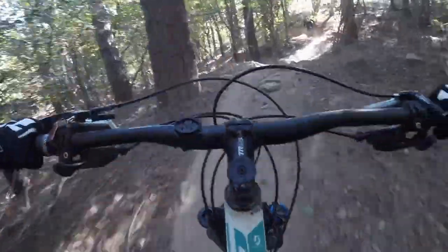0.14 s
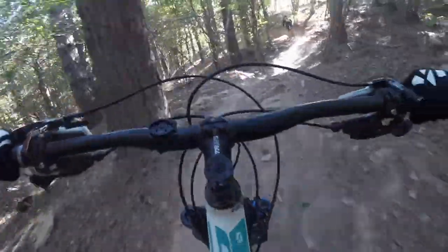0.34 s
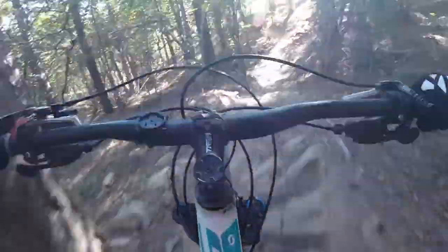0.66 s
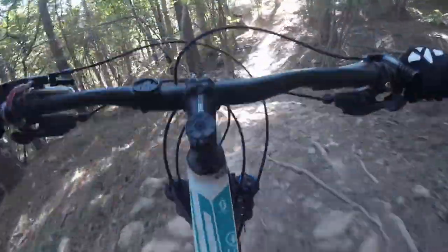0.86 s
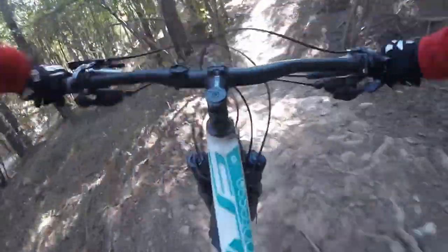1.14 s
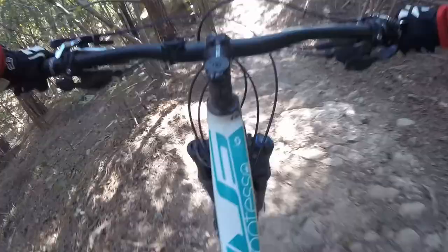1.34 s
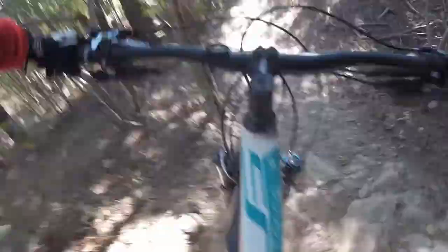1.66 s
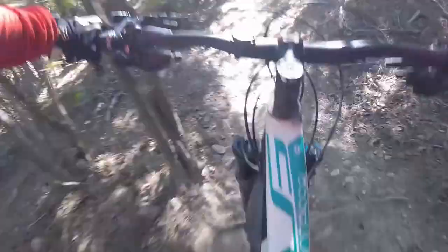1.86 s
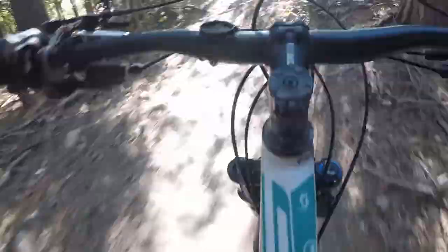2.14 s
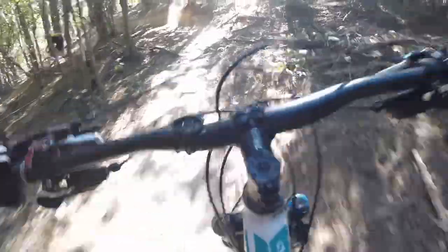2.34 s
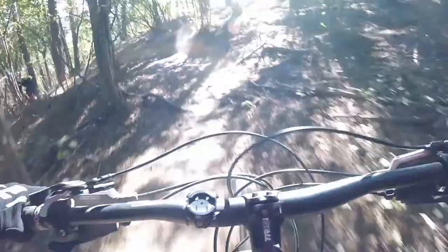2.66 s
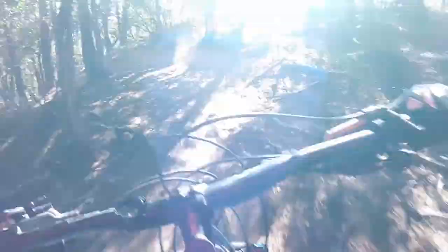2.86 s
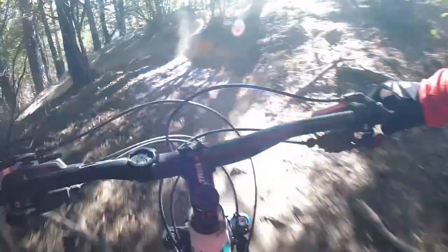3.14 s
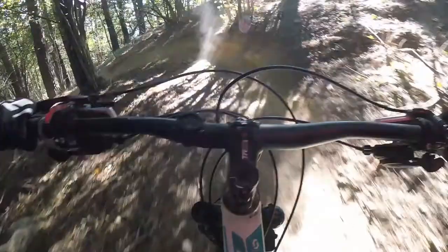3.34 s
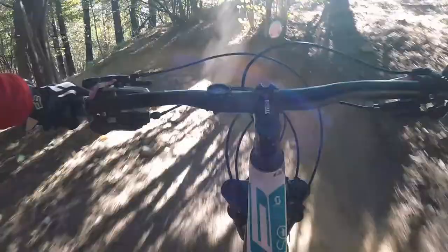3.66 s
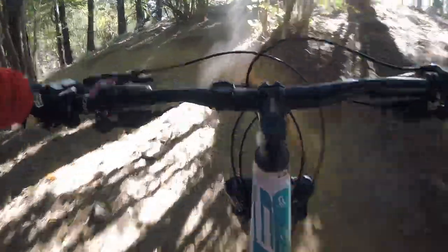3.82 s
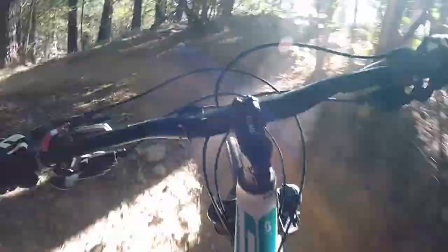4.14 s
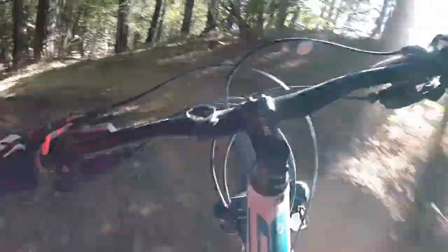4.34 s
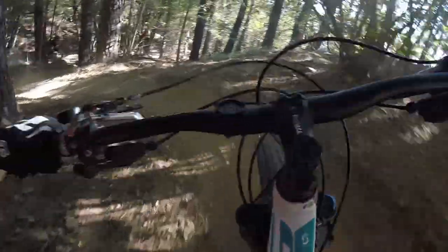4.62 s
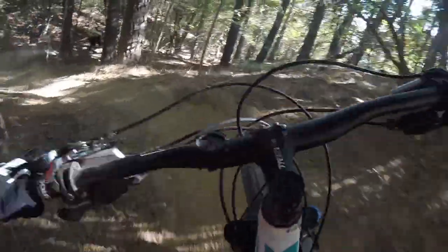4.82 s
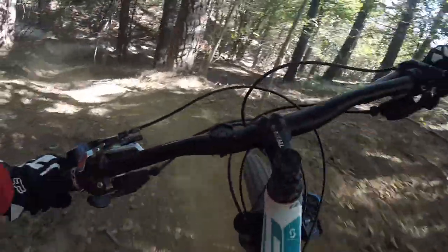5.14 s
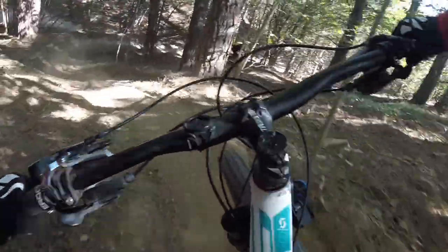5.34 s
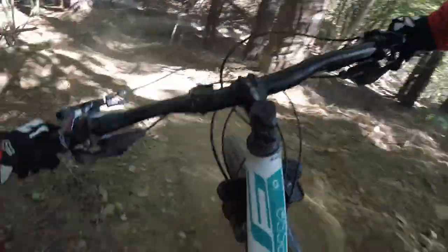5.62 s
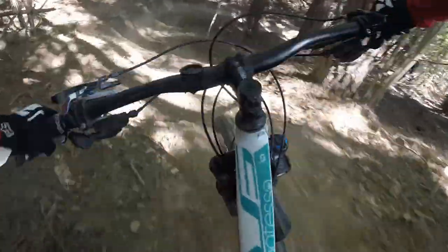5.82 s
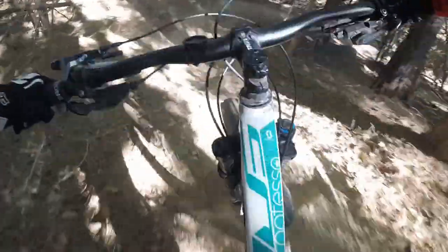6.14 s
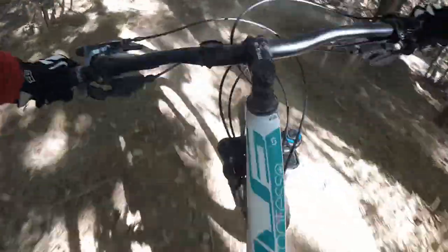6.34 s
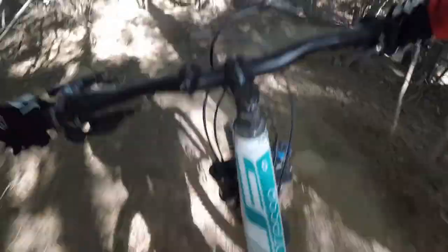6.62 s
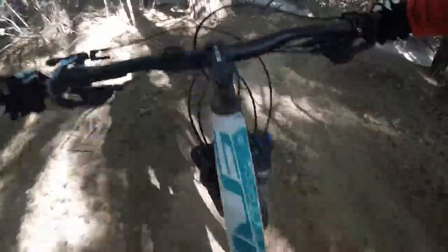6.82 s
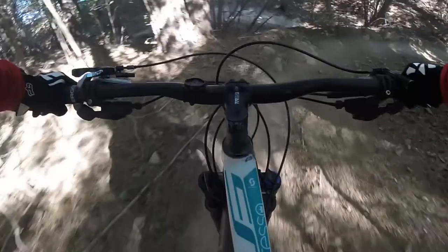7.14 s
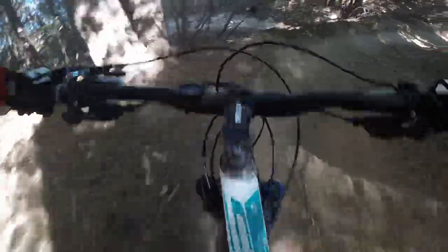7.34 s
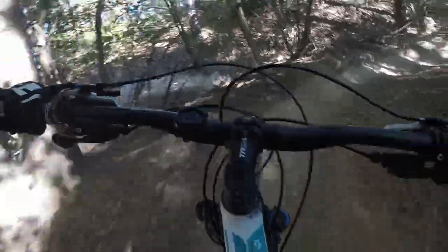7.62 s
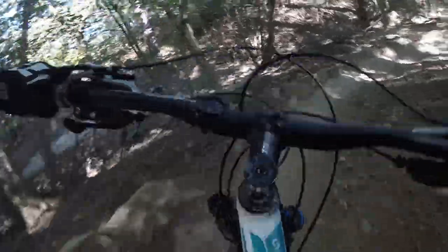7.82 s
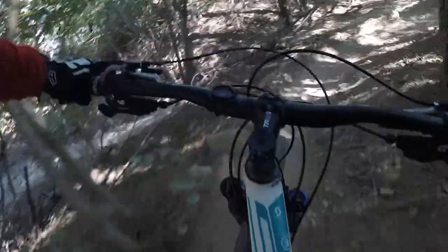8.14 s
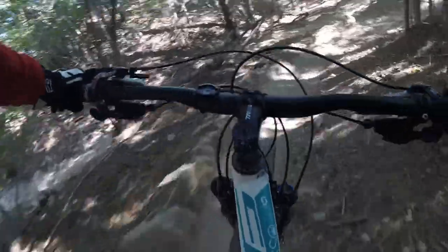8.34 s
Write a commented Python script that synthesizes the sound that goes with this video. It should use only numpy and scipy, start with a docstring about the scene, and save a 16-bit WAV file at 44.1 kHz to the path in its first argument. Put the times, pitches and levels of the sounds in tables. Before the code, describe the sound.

Rough mid-pitched brake howling comes and goes as a bike bounces down a dry rocky trail, tyres rumbling, stones knocking the frame.

```python
"""A disc brake howls in stretches as a mountain bike descends a dry rocky trail, heard at the rider's chest.
The howl is one rotor tone with its harmonics, beside short rising chirps, all made from sine waves.
Wind, tyre rumble, tread hum and the hiss of grit and pads are noise, each with its own spectrum.
Chain and cables rattle in short noise bursts; rocks strike in sharp pushes that ring the frame."""
import sys
import numpy as np
from scipy import signal
from scipy.fft import rfft, irfft, next_fast_len
from scipy.io import wavfile
from scipy.ndimage import uniform_filter1d

SR = 44100
rng = np.random.default_rng(int(sys.argv[2]) if len(sys.argv) > 2 else 0)


def master(y):
    """Save y as 16-bit WAV."""
    cut = np.clip(np.atleast_2d(y).T, -1, 1)
    pcm = np.round(cut * 32767)  # scale
    wavfile.write(sys.argv[1], SR, pcm.astype(np.int16))


N = 373968  # length in samples


def amp(db):
    """Turn decibels into a plain factor."""
    return 10 ** (np.asarray(db) / 20)


def unit(x):
    """Scale x to an RMS level of 1."""
    return x / np.sqrt(np.mean(x ** 2) + 1e-20)


def curves(rows):
    """One value per sample for each column after the time, joined by straight lines."""
    times, *columns = np.transpose(rows)
    return [np.interp(np.arange(N) / SR, times, column) for column in columns]


def wobble(count):
    """A random curve with count knots a second, joined by straight lines."""
    knots = rng.standard_normal(int(N * count / SR) + 2)
    return np.interp(np.arange(N) * count / SR, np.arange(len(knots)), knots)


def filtered(x, response):
    """Multiply the spectrum of x by a response that depends on frequency."""
    size = next_fast_len(N + SR // 2)
    spectrum = rfft(x, size) * response(np.fft.rfftfreq(size, 1 / SR))
    return irfft(spectrum, size)[..., :N]


def coloured(x, points):
    """Shape x by a curve of (frequency [Hz], gain [dB]) points on a log frequency axis."""
    f, db = np.transpose(points)
    return filtered(x, lambda hz: amp(np.interp(np.log(hz + 1), np.log(f + 1), db)))


def ringing(x, modes):
    """Let x ring resonances of (frequency [Hz], width [Hz], gain [dB]); wider ones die away faster."""
    def response(f):
        total = 0
        for k, (centre, width, db) in enumerate(modes):
            damping = 1j * f * width
            total = total + (-1) ** k * amp(db) * damping / (centre * centre - f * f + damping)
        return total

    return filtered(x, response)


def bursts(times, dbs, t60):
    """Noise bursts that start suddenly and fall by 60 dB in t60 seconds."""
    kicks = np.zeros(N)
    kicks[np.round(times * SR).astype(int)] = amp(dbs)
    t = np.arange(SR // 10) / SR
    return signal.fftconvolve(kicks, amp(-60 * t / t60))[:N] * rng.standard_normal(N)


# stretches of braking, each a list of (time [s], relative level of the rotor tone [dB])
HOWL = [
    [(0.0, -20), (0.1, -10.5), (0.338, -19.5), (0.53, -10.5), (0.91, -16.5), (0.93, -16), (1.214, -19),
     (1.398, -41), (1.5, -46)],
    [(3.05, -60), (3.136, -22), (3.24, -12), (3.408, -16.5), (3.596, -13), (3.63, -19.5), (3.68, -8.5),
     (3.892, -15.5), (4.3, -17.5)],
    [(4.3, -20.5), (4.378, -25), (4.552, -19), (4.582, -30), (4.636, -16.5), (5.14, -20), (5.182, -14),
     (5.436, -10.5), (5.6, -26)],
    [(5.6, -24), (5.636, -11), (5.664, -16), (5.728, -9.5), (5.864, -13.5), (5.988, -9), (6.21, -12.5),
     (6.304, -31), (6.33, -19)],
    [(6.33, -28), (6.448, -11), (6.656, -13), (6.69, -25.5), (6.836, -14.5), (7.218, -11), (7.312, -31.5),
     (7.778, -52), (7.8, -64)],
    [(8.2, -48), (8.3, -37), (8.36, -26.5), (8.412, -12.5), (8.47, -17)],
]


def howl_level():
    """Level curve of the rotor tone in dB; it drops to -90 between stretches that do not join."""
    rows = []
    for stretch in HOWL:
        if rows and stretch[0][0] - rows[-1][0] > .1:
            rows += [(rows[-1][0] + .05, -90), (stretch[0][0] - .02, -90)]
        rows += stretch
    return curves(rows)[0]


# the pads bite and the slips sharpen: (time [s], length [s],
# relative levels of 2nd harmonic [dB], brass [dB] and edge [dB])
BITES = [(0.21, 0.59, -37, -34.5, -46), (0.754, 0.094, -17.5, -24.5, -29),
         (0.847, 0.13, -20.5, -27.5, -35.5), (0.976, 0.044, -17, -23.5, -28),
         (3.177, 0.13, -38, -31.5, -44.5), (3.398, 0.26, -29, -29, -42), (3.667, 0.21, -32.5, -38, -51),
         (3.824, 0.2, -32, -25.5, -41), (4.034, 0.13, -27, -28.5, -45), (4.384, 0.16, -20.5, -30.5, -66),
         (4.607, 0.11, -27.5, -30.5, -38), (4.732, 0.13, -24, -65, -62), (4.88, 0.089, -29, -42, -63),
         (4.98, 0.199, -21, -32.5, -58), (5.04, 0.072, -30, -36, -36.5), (5.172, 0.2, -34, -36, -37.5),
         (5.482, 0.036, -26, -30.5, -40), (5.68, 0.22, -35, -30, -40), (5.867, 0.385, -29.5, -36, -42),
         (6.398, 0.274, -29, -32.5, -41), (6.672, 0.21, -35, -45, -54), (6.764, 0.2, -60, -31, -44.5),
         (6.933, 0.12, -16.5, -40, -35), (7.028, 0.21, -60, -36.5, -47), (7.237, 0.12, -41, -48, -56),
         (8.404, 0.09, -21.5, -27, -37)]
BITE_RISE_S, BITE_FALL_S = 0.019, 0.064


def bites():
    """Gains of the 2nd harmonic, brass and edge: each bite rises, holds and falls."""
    t = np.arange(N) / SR
    gains = np.zeros((3, N))
    for start, length, *dbs in BITES:
        rise = (t - start) / BITE_RISE_S + .5
        fall = (start + length - t) / BITE_FALL_S + .5
        shape = np.clip(np.minimum(rise, fall), 0, 1)
        gains = np.maximum(gains, amp(dbs)[:, None] * shape ** 2)
    return gains


# harmonics that grow as the slips sharpen: (multiple of the rotor tone, relative level [dB])
BRASS = [(3, 4), (4, -5), (5, -2.5), (6, -12), (7, -20.5), (8, -19.5)]
# the highest harmonics: (multiple of the rotor tone, relative level [dB])
EDGE = [(9, -3), (10, 1), (11, -6), (12, -11), (13, -20.5), (14, -16.5), (19, -22)]
ROTOR_HZ = 536
SOFT_SECOND_DB, SOFT_BRASS_DB = -15, -26.5  # harmonics between bites, relative to the rotor tone
FLUTTER, FLUTTER_LOW = 0.38, 0.11  # fast roughness of the upper harmonics, and of the lowest two
EDGE_GAPS = 1.5  # a larger value makes the highest harmonics drop out more


def howl():
    """Pads stick and slip at one rotor tone; each harmonic swells, and the upper ones drop out briefly."""
    first_db = howl_level()
    second, brass, edge = bites()
    second_db = 20 * np.log10(second + amp(first_db + SOFT_SECOND_DB))
    brass_db = 20 * np.log10(brass + amp(first_db + SOFT_BRASS_DB))
    edge_db = 20 * np.log10(edge + 1e-5)
    pitch = ROTOR_HZ + wobble(count=12) + 3 * wobble(count=90)
    phase = 2 * np.pi * np.cumsum(pitch) / SR
    grip = wobble(count=40)  # pad pressure varies round the rotor

    def partial(k, db, depth):
        rough = FLUTTER_LOW if k < 3 else FLUTTER
        hold = np.tanh(1.035 + depth * wobble(count=45))  # steady, with short gaps where it changes sign
        swell = amp(db + 3 * np.tanh(depth) * wobble(count=16))
        flicker = 1 + rough * wobble(count=200)
        wave = np.sin(k * phase + rough * wobble(count=110))
        return amp(3.5) * swell * hold * flicker * wave

    tone = partial(1, first_db + 0.29 * grip, 0.31)
    tone += partial(2, second_db + 0.98 * grip, 1.0)
    bite_db = 2.5 * grip
    tone += sum(partial(k, brass_db + db + bite_db, 1.2) for k, db in BRASS)
    tone += sum(partial(k, edge_db + db + bite_db, EDGE_GAPS) for k, db in EDGE)

    # a weaker slip wanders around a pitch just above the 2nd harmonic
    stray = 2 * phase + 2 * np.pi * np.cumsum(45 + 35 * wobble(count=22)) / SR
    stray_gain = amp(second_db - 11.5 + 4.7 * wobble(count=30))
    tone += stray_gain * np.sin(stray + 0.83 * wobble(count=150))

    scrub = unit(ringing(rng.standard_normal(N), [(503.8, 15.5, 20.5), (1043, 51, 3.6)]))
    scrub_gain = amp(0.18 * second_db - 28.5 + 2.2 * wobble(count=25)) * (first_db > -80)
    # grit under the slipping pads
    rasp = unit(ringing(rng.standard_normal(N), [(1540, 480, -11.5), (2620, 91, 6.5)]))
    rasp_gain = amp(0.42 * (brass_db + second_db) - 26.0 + 3.3 * grip)
    return tone + scrub_gain * scrub + rasp_gain * rasp


# strength of the wind: (time [s], level [dB])
WIND = [(0, -11), (.4, -17), (.55, -21), (.9, -18), (1.06, -30), (1.2, -12.5), (1.4, -17), (1.65, -10.5),
        (1.85, -13), (1.95, -6.5), (2.38, -22.5), (2.55, -17), (3.5, -21), (3.75, -12), (4.35, -21.5),
        (4.6, -14), (4.9, -22), (5.75, -16), (6.16, -25), (6.65, -14), (6.85, -19), (7.45, -14), (8.1, -21),
        (8.47, -24.5)]
# spectrum of the wind: (frequency [Hz], relative level [dB])
BUFFET = [(6, -20), (15, 10), (30, 6), (55, -4.5), (90, -41), (200, -51), (400, -120)]


def wind(gust):
    """Wind buffets the microphone: deep noise that swells with the gusts."""
    swell = amp(4.3 * gust + 0.72 * wobble(count=25))
    buffet = unit(swell * coloured(rng.standard_normal(N), BUFFET))
    return amp(curves(WIND)[0]) * buffet


# strength of the tyre rumble: (time [s], level [dB])
GROUND = [(0, -21.5), (.6, -32), (.84, -16.5), (1.18, -31.5), (1.46, -27), (1.52, -9.5), (1.63, -25),
          (1.75, -24), (1.82, -8.5), (1.87, -21.5), (2.08, -19), (2.35, -29), (2.46, -18.5), (2.9, -23.5),
          (3.5, -27.5), (3.8, -24.5), (4.2, -29.5), (5.3, -28.5), (5.46, -21.5), (5.85, -27), (6.16, -31.5),
          (6.32, -17.5), (6.45, -29.5), (6.8, -21), (7.3, -27), (7.45, -21.5), (7.7, -27.5), (8.47, -33.5)]
# spectrum of the tyre rumble: (frequency [Hz], relative level [dB])
RUMBLE = [(30, -31.5), (60, 11.5), (160, -2), (210, -6.5), (300, -15.5), (450, -15), (1500, -28.5),
          (4000, -70)]


def tyre_rumble(gust):
    """Tyres rumble in lumps: low noise with an uneven, limited swing in level."""
    lumps_db = 1.7 * gust + 3 * wobble(count=20) + 4.0 * wobble(count=60)
    lumps = amp(10.3 * np.tanh(lumps_db / 9))
    rumble = unit(lumps * coloured(rng.standard_normal(N), RUMBLE))
    return amp(curves(GROUND)[0]) * rumble


# strength of the hum of the tyre knobs: (time [s], level [dB])
TREAD = [(0, -36), (3.7, -34.5), (5.2, -51), (6.9, -41.5), (8.48, -35.5)]


def tread_hum():
    """Tyre knobs hum: noise narrowed by two resonances in a row."""
    hum = ringing(ringing(rng.standard_normal(N), [(240.0, 27, 0)]), [(250, 96, 0)])
    return amp(curves(TREAD)[0]) * unit(amp(5.9 * wobble(count=15)) * hum)


# strength of the grit hiss: (time [s], relative level [dB])
GRIT = [(0, -33), (1.1, -36.5), (1.55, -36), (2.1, -36.5), (2.35, -38.5), (2.9, -36), (3.9, -34.5),
        (5.5, -39), (7.4, -38.5), (8.47, -38)]
# spectrum of the hiss, also used for the rattle ticks: (frequency [Hz], relative level [dB])
HISS = [(410, 6), (700, -1), (990, 7.5), (1130, -1.5), (1610, 1.5), (2400, -1.5), (2770, -2.5), (4230, -9),
        (5260, -0.5), (8460, -13.5), (10400, -14), (12000, -32.5), (13400, -25.5), (15100, -49.5)]
PAD_HISS_DB = -6.5  # hiss of biting pads, relative to the brass


def hiss():
    """Grit and pads hiss: steady noise plus many tiny grains that die away quickly."""
    loose = np.clip(-howl_level() / 40, .4, 1)  # the tyres skip more when the brake is off
    rough = loose * (wobble(count=12) + wobble(count=45))
    hits = rng.random(N) < 160 / SR  # about 160 stones a second
    stones = hits * amp(9.5 * rng.exponential(size=N).clip(0, 2) + 5.0 * rough)
    grains = signal.fftconvolve(stones, amp(-60 * np.arange(600) / SR / .005))[:N]
    noise = (amp(1.6 * rough) + 0.37 * loose * grains) * rng.standard_normal(N)
    sound = unit(coloured(noise, HISS))
    sound += ringing(sound, [(1610, 17, 8.0), (2750, 16, -5)])  # the shaken rotor rings faintly
    pad_gain = amp(PAD_HISS_DB) * bites()[1]
    return np.hypot(amp(curves(GRIT)[0]), pad_gain) * sound


# main rattles: (time [s], relative level [dB], low part relative to it [dB])
RATTLES = [(0.185, -32.5, 1), (0.948, -25, 0.5), (1.1053, -26, -14), (1.13, -27.5, -4), (1.184, -25, -27),
           (1.246, -19, -22), (1.288, -30, -23), (1.355, -25, -22), (1.4701, -22.5, -6.5), (1.5268, -28, 7),
           (1.549, -21, -33), (1.58, -28, -8), (1.603, -25.5, -20), (1.63, -26.5, -2), (1.666, -28, -11),
           (1.7726, -26, -7), (1.783, -25, -12), (1.826, -26, -20), (1.905, -33, -6), (1.926, -23, -10),
           (1.945, -23, -11), (2.01, -22, -7), (2.0604, -24, -14), (2.163, -32.5, -3), (2.227, -32, -13),
           (2.378, -38, -2), (2.552, -31.5, -1), (2.702, -25, -10.5), (2.783, -24, -18),
           (2.797, -25.5, -25), (3.649, -20, -20), (4.263, -26, -12), (6.978, -22, -26), (7.358, -29, -2),
           (7.4005, -25.5, -9), (7.45, -27, -37), (7.803, -31.5, -25), (7.9, -25, -23.5),
           (8.037, -28.5, -16), (8.12, -30, -10.5), (8.1616, -26.5, -14)]
# resonances of the chain: (frequency [Hz], width [Hz], gain [dB])
CHAIN = [(1640, 110, 12.5), (2600, 450, 16.5), (3120, 790, -11.5)]
# resonances of a slap, also used by the rock knocks: (frequency [Hz], width [Hz], gain [dB])
SLAP = [(870, 1020, -3), (1330, 1040, -4)]
# treble loss of the low rattle parts: (frequency [Hz], gain [dB])
DULL = [(9500, 0), (12000, -12)]
LOOSE_PER_S = 60  # small chance rattles per second
LOOSE_DB = -16  # their base level, relative to the grit curve
BRAKED_DB = -9  # change in their level while the brake holds the bike taut


def rattles():
    """Chain and cables slap the frame in short ticks; small ones follow the grit and fade under braking."""
    s, db, low_db = np.transpose(RATTLES)
    when, size = rng.random((round(N / SR * LOOSE_PER_S), 2)).T
    when = when * (N - 1) / SR
    braking = howl_level() > -36
    grit_db = curves(GRIT)[0] + BRAKED_DB * braking
    loose_db = grit_db[np.round(when * SR).astype(int)] + LOOSE_DB + 12 * size

    low = bursts(s, db + low_db, 0.056) + bursts(when, loose_db, 0.048)
    ticks = bursts(s, db + 0.5, 0.03) + bursts(when, loose_db + 10, 0.0043)
    ticks = uniform_filter1d(ticks, size=2)
    chain = amp(-0.5) * ringing(low, CHAIN)
    slap = amp(-7) * ringing(bursts(when, loose_db, .03), SLAP)
    return amp(7.5) * coloured(ticks, HISS) + coloured(chain + slap, DULL)


# rock strikes: (time [s], relative level [dB], slap relative to it [dB], thump relative to it [dB])
KNOCKS = [(0.167, -21, 20, -4), (0.451, -11, -1, -8), (1.092, -10, -1, -13), (1.24, -7.5, 3, -5),
          (1.444, -26, 14.5, -20), (1.499, -25, -16, 18), (1.526, -14.5, 8, 8.5), (1.554, -2, -25, -14),
          (1.581, -10, -2, 3.5), (1.772, -14, 5, 1), (1.813, -2, -18, 2), (1.99, -7, -2, -19),
          (2.198, -5, -6, -2.5), (2.407, -5, -12, -23), (2.444, -17.5, -1, 6), (2.493, -22, 6.5, -5),
          (2.511, -7, -6, -9), (2.555, -15.5, 0, -16), (2.622, -10.5, 5, -17), (2.683, -15.5, 3, -10),
          (2.855, -20, 3, -17), (2.895, -2, 1, -1), (3.587, -16.5, 7.5, -6), (3.786, -8, 3, -7),
          (3.863, -10, -15, -4), (3.895, -9.5, -9, -9), (4.361, -9, 1, -3), (4.542, 0.5, -8, -43),
          (5.114, -3, -9, -7.5), (5.543, -4.5, -17, -9), (5.833, -13, -29, 10.5), (5.867, -9, -2, -14),
          (5.984, -23.5, -3, 8.5), (6.73, -13.5, -13, -0.5), (6.843, -9.5, -20, -5),
          (6.975, -13.5, -12, -6), (7.357, -13.5, 4.5, -2), (7.687, -31.5, 14, -7), (7.747, -17.5, -3, 2),
          (7.913, -10.5, -19, -20), (8.182, -13, -6, -3)]
# resonances of the frame: (frequency [Hz], width [Hz], gain [dB])
FRAME = [(294.4, 49, 1), (629, 61, -4.5)]
# resonances of the tyre: (frequency [Hz], width [Hz], gain [dB])
TYRE = [(130, 71, 3), (164, 13, -0.5)]


def knocks():
    """A rock strikes tyre or rim: a slap, a push and uneven rebounds ring the frame; the tyre thumps."""
    s, db, slap_db, thump_db = np.transpose(KNOCKS)
    late, weak, later, weaker = rng.random((len(s), 4)).T

    def pushes(delay, dbs, length):
        x = np.zeros(N)
        x[np.round((s + delay) * SR).astype(int)] = amp(dbs)
        return signal.fftconvolve(x, np.hanning(round(length * SR)))[:N]

    blows = pushes(0, db + 12.0, 0.00058)
    blows -= pushes(0.002145 + 0.00287 * late, db + 12.5 - 4 * weak, 0.0012)
    blows += pushes(0.00927 + 0.01317 * later, db + 2.5 - 9 * weaker, 0.0011)
    judder = uniform_filter1d(bursts(s + 0.0043, db + 10, 0.056), size=11)  # the loose bike shakes on
    thump = ringing(pushes(0.0032, db + thump_db + 6, 0.0027), TYRE)
    # rubber softens the contact: two running averages take off treble
    slap = uniform_filter1d(bursts(s, db + slap_db, 0.037), size=9)
    slap = uniform_filter1d(slap, size=7)
    return ringing(blows + judder, FRAME) + thump + amp(10.0) * ringing(slap, SLAP)


# rising chirps beside the 2nd harmonic:
# (time [s], relative level [dB], start pitch [Hz], climb [share of start pitch], length [s])
CHIRPS = [(3.601, -24, 1124, 0.14, 0.098), (4.285, -16, 1055, 0.1, 0.098), (4.702, -16, 1070, 0.056, 0.046),
          (4.876, -14, 1060, 0.043, 0.055), (4.931, -15, 1073, 0.024, 0.065),
          (5.139, -17, 1056, 0.052, 0.061), (5.472, -13.5, 1058, 0.061, 0.12),
          (6.219, -23, 1080, 0.097, 0.099), (6.374, -23, 1072, 0.087, 0.07),
          (6.638, -10, 1051, 0.082, 0.047)]
CHIRP_TURN = 1.82  # radians of the sine arch that the pitch follows; past 1.6 it sags again


def chirps():
    """A second stick-slip starts, climbs in pitch as the pad stiffens, sags and lets go."""
    out = np.zeros(N + SR)
    uneven, ragged = wobble(count=160), wobble(count=70)
    for s, db, hz, climb, length in CHIRPS:
        u = np.linspace(0, 1, round(length * SR))  # progress through the chirp
        at = round(s * SR)
        span = slice(at, at + len(u))
        pitch = hz * (1 + climb * np.sin(CHIRP_TURN * u))
        phase = 2 * np.pi * np.cumsum(pitch) / SR + 0.7 * uneven[span]
        gain = amp(db + 3.3 * np.tanh(ragged[span])) * np.sin(np.pi * u ** 0.52)
        out[span] += gain * (np.sin(phase) + 0.84 * np.sin(phase / 2))  # with a tone an octave below
    return out[:N]


def scene():
    """Add up all the sounds; the same gusts move the wind and, slightly, the tyre rumble."""
    gust = wobble(count=10)
    ride = wind(gust) + tyre_rumble(gust) + tread_hum() + hiss()
    return (howl() + ride + rattles() + knocks() + chirps())[None]


SELF_NOISE_DB = -72  # steady hiss of the microphone
TOP_HZ = 15220  # band limit


def record(dry):
    """Add microphone self-noise, clip loud peaks softly and remove all above the band limit."""
    heard = dry + amp(SELF_NOISE_DB) * rng.standard_normal(N)
    held = heard / (1 + np.abs(heard / .95) ** 6) ** (1 / 6)
    return filtered(held, lambda hz: hz < TOP_HZ)


dry = scene()
out = record(dry)
master(out)
```